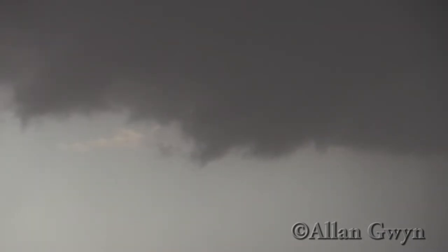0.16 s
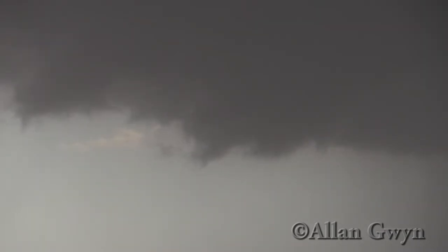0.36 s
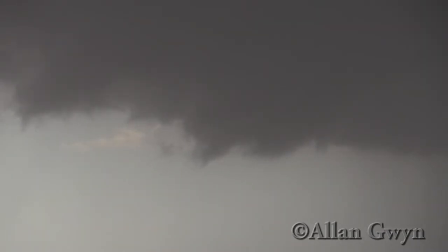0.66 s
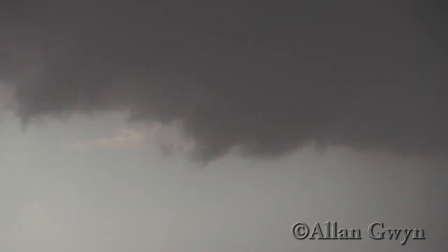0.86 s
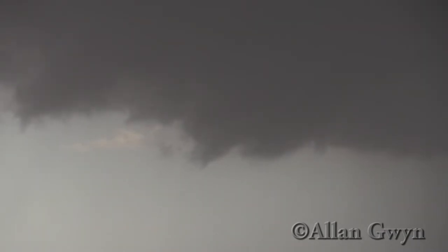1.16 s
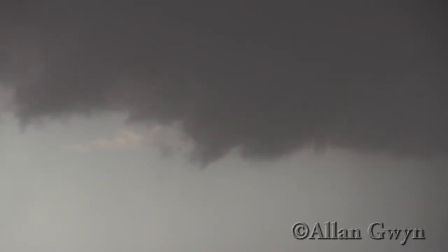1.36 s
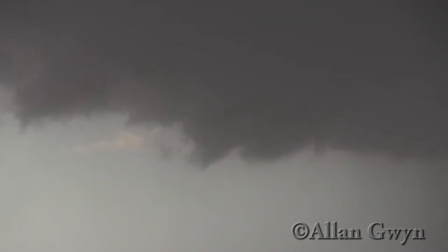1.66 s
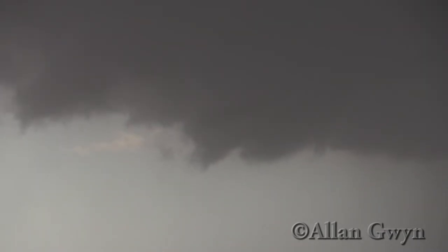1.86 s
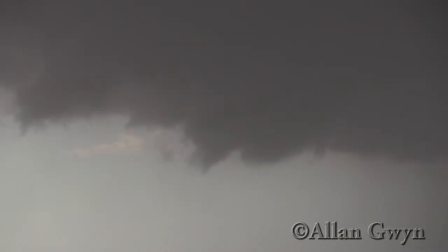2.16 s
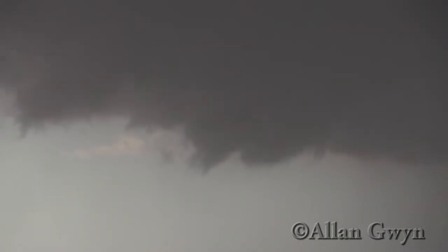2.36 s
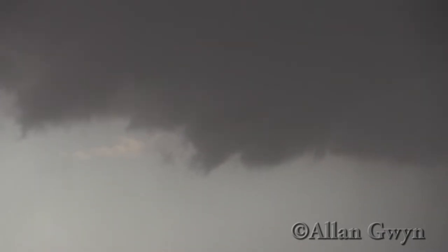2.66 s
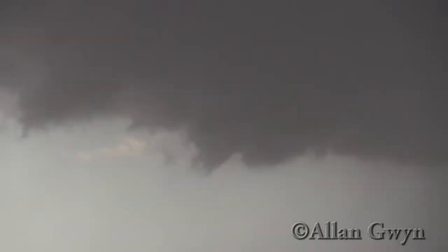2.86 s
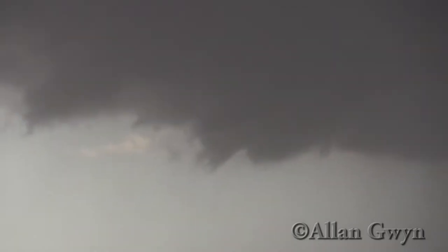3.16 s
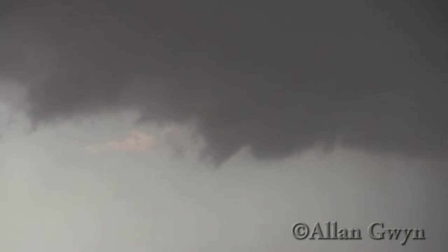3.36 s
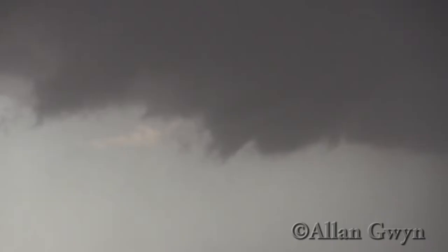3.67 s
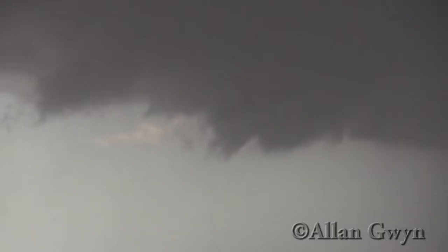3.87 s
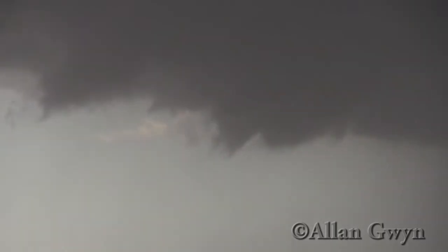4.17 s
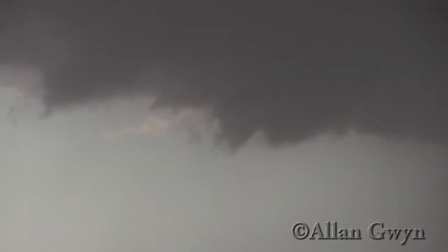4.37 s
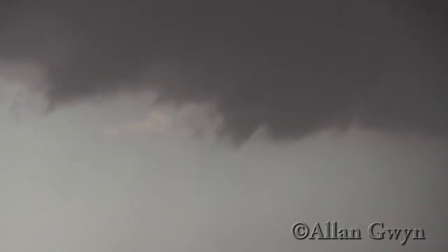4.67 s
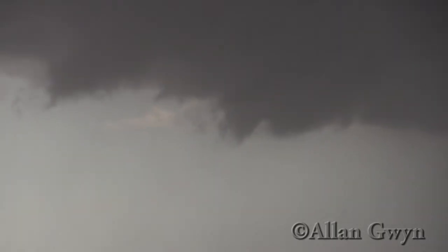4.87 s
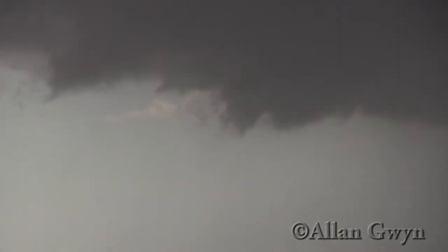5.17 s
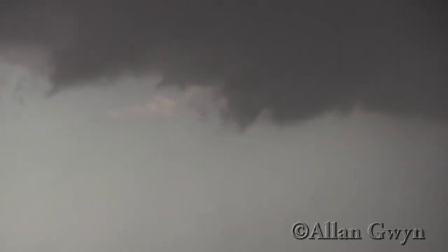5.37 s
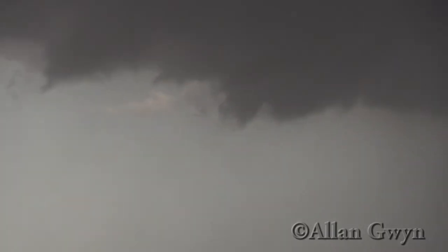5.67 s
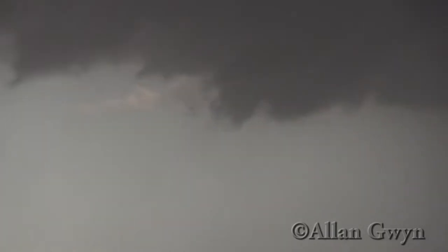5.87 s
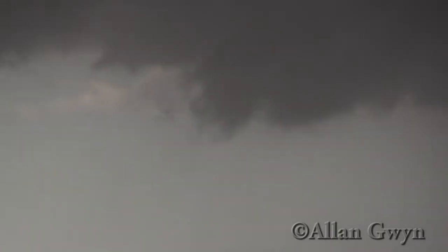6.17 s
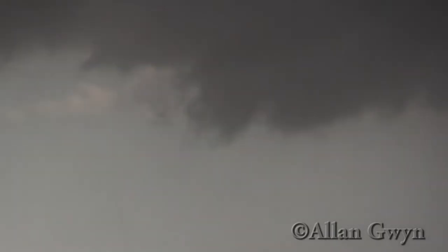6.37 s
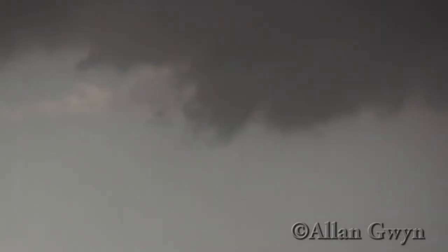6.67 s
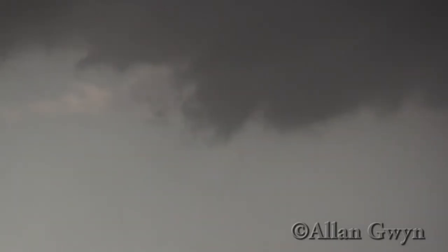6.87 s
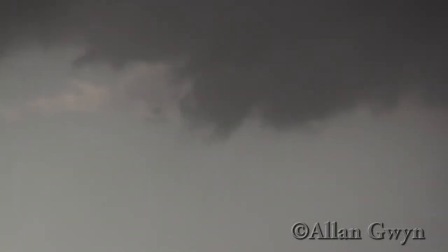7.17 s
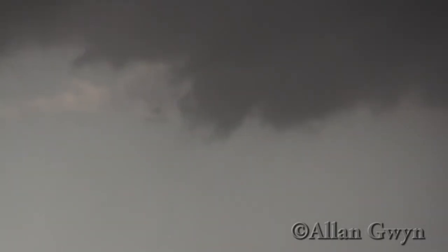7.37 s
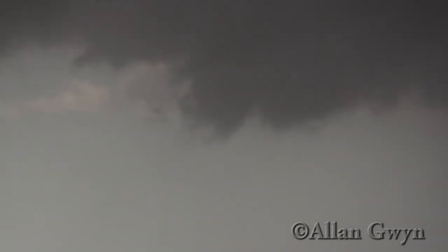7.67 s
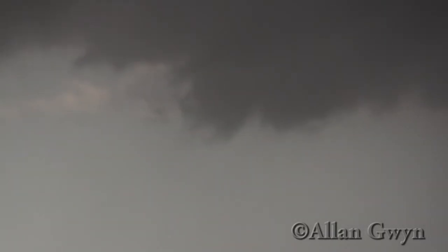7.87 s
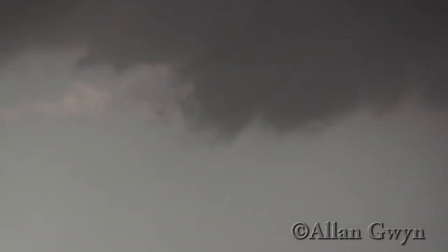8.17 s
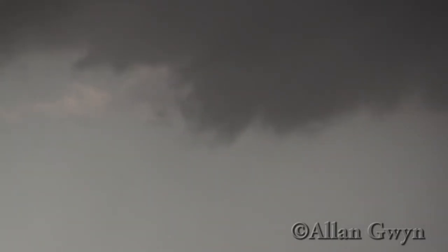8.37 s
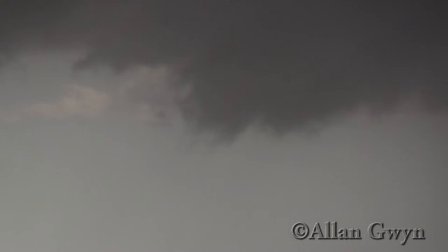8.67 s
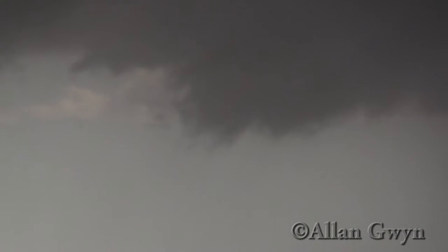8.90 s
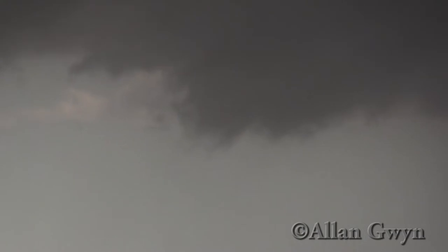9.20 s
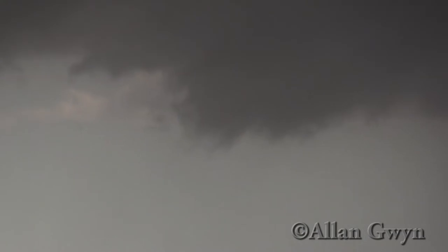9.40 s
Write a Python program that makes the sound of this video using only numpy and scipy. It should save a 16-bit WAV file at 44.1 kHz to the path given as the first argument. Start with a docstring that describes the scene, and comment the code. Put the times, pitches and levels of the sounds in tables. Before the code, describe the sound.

Rain drums on thin car panels and windows, close around the listener. Loud and faint drops mix without rhythm, roughly a dozen distinct hits a second, with dull hollow roof knocks, brief clear taps and tiny glassy ticks. The treble dies at once while the bass lingers briefly in the cabin. After a sparser moment early on, it stays busy, with the strongest strikes from six to eight and a half seconds.

```python
"""Inside a parked car, raindrops strike the roof and windows, from faint ones to heavy ones.
Each drop clicks on contact and shakes the thin panels: bands of noise that die fast in the treble, linger in the bass.
Every drop also rings the glass, and there are hollow roof knocks and clear taps: all decaying sines.
Weaker touches surround each single drop and random drops patter between, over steady cabin rumble and far rain hiss.
The cabin air lifts a few pitches."""
import sys
import numpy as np
from scipy import signal
from scipy.io import wavfile

SR = 44100
rng = np.random.default_rng(int(sys.argv[2]) if len(sys.argv) > 2 else 0)


def master(y):
    """Save y as 16-bit WAV."""
    cut = np.clip(np.atleast_2d(y).T, -1, 1)
    pcm = np.round(cut * 32767)  # scale
    wavfile.write(sys.argv[1], SR, pcm.astype(np.int16))


N = 420694   # length in samples

# All levels below are relative settings, before the cabin and the final rounding.
# Single drops, loud and faint: t/s, crack level/dB, panel ring level/dB, glass tick level/dB
SINGLE_DROPS = [(.007, -22, -16.5, -41.5), (0.067, -21, -14.5, -86), (0.141, -53, -40, -39.5),
                (.171, -34, -18, -59), (0.2, -40, -30, -44), (0.228, -17.5, -24, -29),
                (.249, -17.5, -18.5, -32), (0.366, -24, -33, -54), (.374, -22, -34, -33.5),
                (0.416, -10, -14.5, -25), (.457, -24, -25, -39), (.482, -21, -18, -40),
                (.521, -24, -28, -27), (.528, -16, -18, -15.5), (0.553, -6, -12, -21), (.64, -35, -38, -44),
                (.677, -36, -28, -33), (.71, -30, -25, -48), (.744, -18, -16.5, -17.5),
                (.787, -39, -46, -37), (0.864, -15.5, -22, -33.5), (0.999, -30, -24, -37.5),
                (1.023, -17, -32, -70), (1.088, -29.5, -29, -67), (1.229, -46, -55, -42),
                (1.309, -47, -28.5, -47), (1.337, -38, -39, -34), (1.378, -33, -38, -65),
                (1.487, -40, -51, -46), (1.507, -22, -24.5, -37.5), (1.528, -31, -23, -43),
                (1.621, -20.5, -16.5, -31), (1.833, -24, -14, -35), (1.903, -21, -16, -37),
                (1.998, -29, -19.5, -39), (2.034, -14.5, -22, -16.5), (2.076, -12, -12.5, -20),
                (2.207, -13.5, -21, -12.5), (2.283, -19, -15.5, -39), (2.308, -36, -37, -31),
                (2.34, -21, -15.5, -23.5), (2.43, -14, -11.5, -40), (2.49, -29, -18, -35),
                (2.517, -23, -33, -26), (2.557, -17, -20, -32), (2.635, -52, -53, -27.5),
                (2.673, -22, -20, -36), (2.711, -27, -23, -28), (2.728, -14, -12.5, -26),
                (2.751, -14.5, -39, -26.5), (2.82, -18, -15, -41), (2.893, -22, -30, -34),
                (3.014, -21, -15.5, -64), (3.06, -32, -25, -39), (3.091, -21, -12, -31),
                (3.149, -28, -39, -33.5), (3.168, -13, -10.5, -26.5), (3.194, -24, -19, -33),
                (3.23, -22.5, -22, -32), (3.303, -24.5, -41, -37), (3.33, -20.5, -20.5, -38.5),
                (3.382, -22.5, -15, -38), (3.446, -26, -32, -51), (3.562, -17.5, -8.5, -33),
                (3.579, -16, -34, -37), (3.631, -19, -18.5, -43), (3.721, -19.5, -19.5, -48),
                (3.781, -20, -23, -38.5), (3.999, -33, -22.5, -36.5), (4.129, -33, -53, -37),
                (4.161, -30, -25, -32), (4.204, -17, -19, -36), (4.235, -22, -40, -32.5),
                (4.258, -19.5, -22, -44), (4.288, -21, -44, -35.5), (4.308, -29, -19.5, -53),
                (4.367, -18, -13.5, -35.5), (4.441, -22, -19.5, -47), (4.494, -16, -17.5, -30.5),
                (4.557, -17, -25, -20), (4.633, -32, -41, -34), (4.641, -10, -9, -24.5),
                (4.675, -20, -18, -35), (4.701, -15.5, -14, -46), (4.743, -28, -20, -34),
                (4.765, -24, -18, -23), (4.815, -22.5, -15, -34.5), (4.942, -27, -16.5, -32),
                (4.956, -17, -17.5, -36), (4.991, -25, -21, -31), (5.13, -20.5, -15.5, -30),
                (5.169, -23, -15, -38), (5.187, -40, -33, -39), (5.209, -22, -19, -48),
                (5.287, -27, -36, -41), (5.335, -30, -34, -48), (5.369, -22.5, -19, -59),
                (5.408, -17.5, -16, -26.5), (5.459, -27.5, -24, -35), (5.598, -20.5, -21.5, -26),
                (5.672, -24, -42, -34.5), (5.708, -19, -14, -24.5), (5.811, -14, -13, -29.5),
                (5.93, -27, -23, -23), (6.003, -31, -33, -33), (6.011, -16.5, -18.5, -32),
                (6.053, -38, -11.5, -32), (6.065, -9.5, -16.5, -33), (6.082, -28, -21, -29.5),
                (6.205, -16.5, -16, -36.5), (6.313, -12, -20.5, -23.5), (6.333, -12, -11.5, -25.5),
                (6.407, -13, -20, -23), (6.414, -4, -8, -15.5), (6.531, -20, -26, -34),
                (6.61, -34, -26, -35), (6.65, -10, -10.5, -23.5), (6.704, -38, -29, -32),
                (6.788, -49, -52, -37.5), (6.824, -18, -28, -37), (6.828, -6, -11, -32.5),
                (6.877, -18, -21, -40), (6.896, -24, -18, -32), (6.934, -31, -24, -46),
                (7.022, -18, -17, -36), (7.03, -7.5, -10, -20.5), (7.095, -31, -33, -33),
                (7.158, -28, -22, -46), (7.197, -25, -29, -41), (7.21, -45, -36, -41),
                (7.245, -12.5, -8, -13.5), (7.297, -49, -40, -36), (7.322, -16, -23, -43),
                (7.339, -23, -10.5, -31), (7.388, -16.5, -15, -31), (7.415, -12, -14.5, -23),
                (7.435, -25, -34, -33), (7.498, -27, -38, -38.5), (7.551, -37, -38, -31.5),
                (7.56, -15, -12, -42), (7.645, -16.5, -14.5, -44), (7.763, -9, -4, -33),
                (7.814, -24, -17, -44), (7.981, -34, -24.5, -34.5), (7.998, -18.5, -17.5, -53),
                (8.055, -28, -25, -39.5), (8.139, -26, -24, -43), (8.168, -30, -19, -44),
                (8.186, -19, -13, -40), (8.194, -13, -12.5, -38), (8.261, -31, -22, -42),
                (8.273, -16, -11.5, -39), (8.373, -24.5, -21, -43), (8.417, -1, -5, -34),
                (8.497, -26, -16, -34.5), (8.52, -12.5, -15, -41), (8.546, -19, -14, -36.5),
                (8.586, -18, -15, -50), (8.653, -25.5, -30, -28), (8.712, -25, -16.5, -63),
                (8.773, -18, -16.5, -32), (8.891, -33, -47, -40), (8.96, -21, -19.5, -40),
                (8.987, -26, -20, -37), (9.016, -17.5, -23, -39), (9.143, -27, -35, -54),
                (9.2, -22, -19, -29), (9.206, -15.5, -12.5, -30), (9.271, -27, -28, -42),
                (9.327, -32, -34, -41), (9.342, -18, -16, -38), (9.459, -15.5, -14, -21),
                (9.524, -15, -22, -25.5)]
# Centres of the four parts of a drop, boom, ring, crack and tick: f/Hz
PART_HZ = [190, 700, 2500, 7000]
# Tone colour of the panels, added to those parts: f/Hz, level/dB
PANEL_COLOUR = [(70, -32.5), (110, -17.5), (200, -10.5), (420, -18.5), (800, -16.5), (1400, -15),
                (2100, -19.5), (3200, -8.5), (4700, -9), (6500, -3.5), (8500, -14.5), (11000, -13.5),
                (15000, -51)]
# How the panels build and die: f/Hz, rise/s, t60/s, cabin tail level/dB, tail t60/s (t60: time to die by 60 dB)
PANEL_DECAY = [(79.5, 0.015, 0.092, -54, 0.38), (258, 0.0072, 0.32, -4, 0.39),
               (620, 0.0031, 0.17, -11.5, 0.65), (1950, 0.001, 0.11, -11.5, 0.29),
               (4700, 0.00071, 0.054, -12, 0.16), (13700, 0.00097, 0.037, -22, 0.19)]
# Ringing modes of the window glass: f/Hz, level/dB, t60/s
GLASS_MODES = [(3116, -5, 0.067), (3710, 2, 0.038), (4530, -18, 0.018), (5330, -8.5, 0.039),
               (6070, -2, 0.026), (7100, 0.5, 0.019), (8700, -7, 0.016), (11300, -20, 0.031)]
# Slow course of the pattering drops' loudness: t/s, level/dB
PATTER_LEVEL = [(0.0, -34.5), (1.43, -46), (2.26, -30), (4.22, -34), (4.33, -33.5), (9.54, -33.5)]
# Pattering drops' boom, ring, crack and tick, added to that course: level/dB
PATTER_COLOUR = [-5.5, -6, -8, -23.5]
# Steady cabin rumble and far rain hiss: f/Hz, level/dB per Hz
RUMBLE = [(25, -84), (36, -78), (50, -81), (75, -76), (130, -64.5), (260, -67.5), (600, -97), (1700, -99),
          (4000, -104.5), (9000, -110), (15500, -130)]
# How alike the left and right noise are: f/Hz, likeness (1 = the same, 0 = unrelated)
LIKENESS = [(60, 1), (240, 0.97), (950, 0.65), (3770, 0.53), (15000, 0.64)]
# Stereo balance: f/Hz, left minus right level/dB
BALANCE = [(60, 3), (240, 4), (950, 2), (3770, 0), (15000, -0.5)]
# Resonances of the cabin air: f/Hz, width/Hz, level/dB of the part added to the sound
CABIN_MODES = [(131, 7.5, 0), (184, 6.3, -19), (420, 79, 4), (707, 176, -1), (1126, 24, -5.5)]
# Hollow knocks and plops where a drop meets the open roof: t/s, level/dB, centre f/Hz
ROOF_KNOCKS = [(.17, -24.5, 778), (.46, -21, 757), (0.742, -13.5, 220), (1.095, -32, 800),
               (2.436, -5.5, 269.4), (2.466, -5, 174), (2.555, -10.5, 256), (3.103, -7, 124),
               (3.17, -11, 299), (3.213, -2.5, 175), (3.239, -20.5, 435), (3.769, -10.5, 256),
               (3.93, -13.5, 260), (4.201, -14, 295), (4.73, -12, 196), (5.167, -14, 402),
               (6.203, -9.5, 291), (6.208, -11.5, 754), (6.651, -13.5, 872), (7.033, -10, 140),
               (7.15, -11.5, 270), (7.268, -12, 262), (7.356, -10, 165.4), (7.763, -22, 866),
               (8.195, -19, 682), (8.205, -12, 680), (8.232, -16, 710), (8.422, -15.5, 433),
               (8.445, -11.5, 647), (9.202, -14, 187)]
# The whole roof answers the deepest hard knocks: f/Hz, level/dB added to the knock's, t60/s
ROOF_SWAY = (98, -18, 0.55)
# Clear taps where the struck spot rings around one pitch: t/s, level/dB, centre f/Hz
TAPS = [(.008, -18.5, 2140), (0.419, -18, 3370), (.528, -26, 3720), (0.744, -12, 5830), (.866, -18, 2230),
        (1.621, -27, 2220), (2.075, -17.5, 3020), (2.206, -9, 5960), (2.208, -7.5, 3210),
        (2.308, -25, 6100), (2.518, -18, 4400), (2.56, -10.5, 2290), (3.169, -18, 3100), (3.386, -15, 2380),
        (4.206, -20, 2430), (4.208, -19, 1500), (4.495, -17.5, 3130), (4.495, -15, 1930),
        (4.557, -17, 6130), (4.643, -8.5, 3390), (5.709, -24, 5800), (5.813, -19.5, 3590),
        (6.014, -15, 2730), (6.067, -6.5, 2910), (6.207, -12, 3300), (6.414, -4, 3560), (6.421, -4, 3050),
        (6.533, -24, 3030), (6.652, -21, 3980), (7.037, -11, 3130), (7.096, -26, 6000), (7.098, -28, 3200),
        (7.245, -2.5, 6040), (7.434, -16, 3080), (7.765, -15, 1840), (8.418, -6, 3670), (8.425, -8, 2870),
        (8.523, -15, 1554), (9.146, -24, 1950), (9.208, -13, 3280), (9.459, -19, 3430)]

BOOM_DB = -12   # roof boom, relative to the panel ring
TAP_T60_S, KNOCK_T60_S = 0.031, 0.1
DEEP_HZ, HARD_DB = 200, -10   # knocks below this pitch and above this level sway the roof
SNAP_DB, SNAP_SCATTER_DB = -6.5, -0.5   # contact click relative to the crack, and its random scatter
SNAP_BAND_HZ = (1300, 7940)
GLASS_DB, GLASS_SCATTER_DB = -11, 5   # level added to the ticks, and its random scatter
GLASS_SPLIT = 0.02   # each glass mode is a pair, this share of its pitch apart
TOUCH_SPAN_S, TOUCH_LEAD_S = 0.02, 0.0027   # time span of the weaker touches, and how early it starts
TOUCH_DB, TOUCH_LOSS_DB = -10.5, 3.5   # touches relative to their drop, and loss by the span's end
PATTER_PER_S = 110   # average number of pattering drops per second
CUTOFF_HZ = 16600   # the treble is fully cut from here up


def from_db(db):
    """Turn dB into a gain."""
    return 10 ** (np.asarray(db) / 20)


def at_hz(points, hz):
    """Read every column of a table at one frequency, on a logarithmic pitch scale."""
    rows = np.array(points, float)
    return [np.interp(np.log(hz), np.log(rows[:, 0]), column) for column in rows[:, 1:].T]


def sides(db, pan_db):
    """Left and right levels in dB, pan_db apart."""
    return np.array([db + pan_db / 2, db - pan_db / 2])


def balance_gains(hz):
    """Left and right gains at one frequency, as a column."""
    return from_db(sides(0, at_hz(BALANCE, hz)[0]))[:, None]


def fade(power, t60):
    """Power that dies by 60 dB in t60 seconds, as damping drains it."""
    return signal.lfilter([1], [1, -from_db(-120 / (max(t60, .01) * SR))], power)


def ring(clicks, hz, t60):
    """A resonance: each unit click starts a dying sine of height 1."""
    r = from_db(-60 / (t60 * SR))
    w = 2 * np.pi * hz / SR
    return signal.lfilter([0, np.sin(w)], [1, -2 * r * np.cos(w), r * r], clicks + 1e-18)


def single_drops_and_touches():
    """Four weaker touches surround each single drop, from just before it to shortly after: times and levels."""
    s, crack, panel, tick = np.transpose(SINGLE_DROPS)[:4]
    times = [s]
    parts = [np.array([panel + BOOM_DB, panel, crack, tick])]
    for late, strong in rng.random((400, 2, 4))[:len(s)].T:
        times.append(s - TOUCH_LEAD_S + TOUCH_SPAN_S * late)
        parts.append(parts[0] + TOUCH_DB - TOUCH_LOSS_DB * late + 2.0 * (strong - .5))
    return times, parts


def all_drops():
    """Join single drops, touches and random patter: sample index, part levels, pan and unevenness in dB."""
    times, parts = single_drops_and_touches()
    gap, size, place, *tone = rng.random((3000, 7)).T
    patter_s = np.cumsum(-np.log(gap + 1e-9)) / PATTER_PER_S   # random gaps
    heard = patter_s < N / SR
    patter_db = np.interp(patter_s, *np.transpose(PATTER_LEVEL)) - 1.33 * np.log(size + 0.06)
    spot_db = 13.0 * (np.array(tone) - .5)   # each lands on another spot
    patter = patter_db + np.array(PATTER_COLOUR)[:, None] + spot_db
    at = (np.hstack(times + [patter_s[heard]]) * SR).astype(int)
    uneven = np.where(np.arange(len(at)) < len(times[0]), 2.2, 5.0)   # single drops vary less
    pan = 1.3 * (place[:len(at)] - .5)
    return np.clip(at, 0, N - 1), np.hstack(parts + [patter[:, heard]]), pan, uneven


def panel_power(at, level, hz):
    """Each blow's power spreads through the panel, then dies, with a weaker tail in the cabin."""
    blows = np.full(N, 1e-18)
    np.add.at(blows, at, from_db(2 * level))   # doubled dB gives power
    rise, t60, tail_db, tail_t60 = at_hz(PANEL_DECAY, hz)
    slow = np.exp(-1 / (max(rise, 1e-4) * SR))
    built = signal.lfilter([(1 - slow) ** 2], [1, -2 * slow, slow ** 2], blows)
    return fade(built, t60) + from_db(2 * tail_db) * fade(built, tail_t60)


def panels_and_rumble(at, parts, pan, uneven):
    """Dense panel modes act as third-octave noise, whose power follows the drops above the rumble."""
    edges = 32 * 2 ** (np.arange(28) / 3)   # Hz
    spots = rng.standard_normal((3600, len(edges)))[:len(at)]   # each spot drives the bands unevenly
    white = rng.standard_normal((2, 2, N))
    out = np.zeros((2, N))
    for k, (low, high) in enumerate(zip(edges, edges[1:])):
        hz = np.sqrt(low * high)
        band = signal.butter(2, [low, high], "band", fs=SR, output="sos")
        mid, side = signal.sosfilt(band, white[k % 2])
        alike = np.clip(at_hz(LIKENESS, hz)[0], 0, 1)
        stereo = np.sqrt(1 + alike) * mid + np.sqrt(1 - alike) * side * [[1], [-1]]
        noise = stereo / mid.std() / np.sqrt(2)
        # blend the parts of the drop on either side of this band
        place = np.interp(np.log(hz), np.log(PART_HZ), range(4))
        weights = np.maximum(1 - np.abs(place - np.arange(4)), 0)
        level = weights @ parts + at_hz(PANEL_COLOUR, hz)[0] + uneven * spots[:, k]
        power = panel_power(at, level, hz) + rumble_power(low, high)
        out += noise * np.sqrt(power) * balance_gains(hz)
    return out


def contact_snaps(at, parts, pan, uneven):
    """Every drop begins with a needle-sharp click of contact, kept within a treble band."""
    strong, sign = rng.standard_normal((3600, 2))[:len(at)].T
    clicks = np.full((2, N), 1e-18)
    level = parts[2] + SNAP_DB + SNAP_SCATTER_DB * strong
    for channel, db in enumerate(sides(level, pan)):
        np.add.at(clicks[channel], at, np.sign(sign) * from_db(db))
    band = signal.butter(2, SNAP_BAND_HZ, "band", fs=SR, output="sos")
    return signal.sosfilt(band, clicks)


def ringing_hits(rows, spread, cycles):
    """Each hit (t/s, level/dB, f/Hz, t60/s) rings four close modes, which beat and differ left and right."""
    out = np.zeros((2, N + SR))
    for (s, db, hz, t60), (detune, phase, turn) in zip(rows, rng.random((400, 3, 4))):
        t = np.arange(int(np.clip(t60, .01, 1) * SR)) / SR
        build = (1 - np.exp(-t * hz / cycles)) ** 2   # takes a few cycles
        shape = build * from_db(db - 4.5 - 60 * t / t60)
        pitches = hz + min(spread * hz, 500.0) * (detune - .5)
        start = 2 * np.pi * phase + 0.96 * (turn - .5) * [[1], [-1]]
        modes = np.sin(2 * np.pi * pitches[:, None] * t + start[..., None]).sum(axis=1)
        first = int(s * SR)
        out[:, first:first + len(t)] += balance_gains(hz) * shape * modes
    return out[:, :N]


def roof_knocks():
    """Drops knock the open roof into a hollow ring; deep, hard knocks also sway the whole roof."""
    rows = [(s, db, hz, KNOCK_T60_S) for s, db, hz in ROOF_KNOCKS]
    sway_hz, sway_db, sway_t60 = ROOF_SWAY
    rows += [(s, db + sway_db, sway_hz, sway_t60)
             for s, db, hz in ROOF_KNOCKS if hz < DEEP_HZ and db > HARD_DB]
    return ringing_hits(rows, spread=0.564, cycles=1.2)


def clear_taps():
    """The struck spot rings briefly around one pitch."""
    return ringing_hits([(*tap, TAP_T60_S) for tap in TAPS], spread=0.2, cycles=1.1)


def glass(at, parts, pan, uneven):
    """Every drop's tick rings the window's paired modes, each with a random strength and side."""
    out = np.zeros((2, N))
    luck = rng.standard_normal((3600, 2, 2 * len(GLASS_MODES)))[:len(at)]
    pairs = [(hz * (1 + half * GLASS_SPLIT), db, t60)
             for hz, db, t60 in GLASS_MODES for half in (-.5, .5)]
    for (hz, mode_db, t60), (own, lean) in zip(pairs, luck.T):
        clicks = np.zeros((2, N))
        level = parts[3] + mode_db + GLASS_DB + GLASS_SCATTER_DB * own
        for channel, db in enumerate(sides(level, 4.0 * lean)):
            np.add.at(clicks[channel], at, from_db(db))
        out += ring(clicks, hz, t60)
    return out


def rumble_power(low, high):
    """Steady rumble and hiss: power per Hz times the width of the band."""
    return from_db(2 * at_hz(RUMBLE, np.sqrt(low * high))[0]) * (high - low)


def cabin(x):
    """The air in the cabin resonates and lifts a few pitches."""
    out = x.copy()
    for hz, width_hz, level_db in CABIN_MODES:
        r = np.exp(-np.pi * width_hz / SR)
        top = np.array([1, 0, -1]) * (1 - r * r) / 2
        bottom = [1, -2 * r * np.cos(2 * np.pi * hz / SR), r * r]
        out += from_db(level_db) * signal.lfilter(top, bottom, x)
    return out


def scene():
    """Panels, contact clicks, taps, roof and glass add up, heard through the cabin air."""
    drops = all_drops()
    strikes = panels_and_rumble(*drops) + contact_snaps(*drops)
    strikes += clear_taps() + roof_knocks() + glass(*drops)
    return cabin(strikes)


def record(dry):
    """Round off the loudest peaks, then cut the top of the treble."""
    rounded = dry / (1 + np.abs(dry) ** 4) ** .25
    return signal.sosfilt(signal.cheby2(14, 90, CUTOFF_HZ, fs=SR, output="sos"), rounded)


dry = scene()
out = record(dry)
master(out)
```